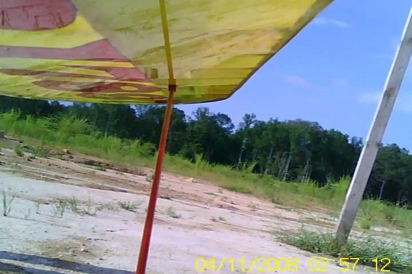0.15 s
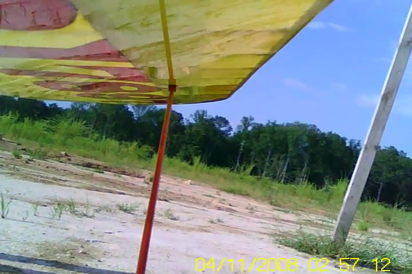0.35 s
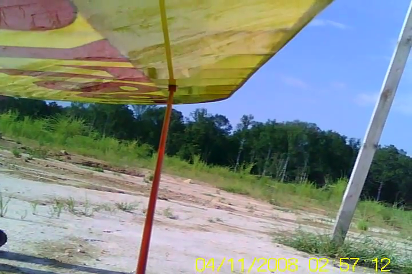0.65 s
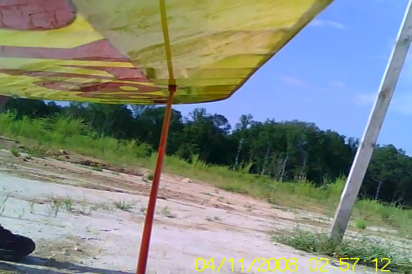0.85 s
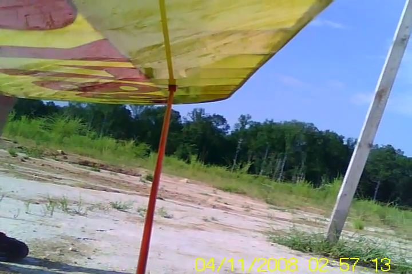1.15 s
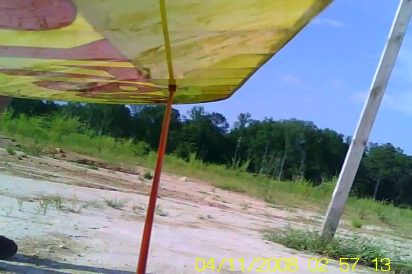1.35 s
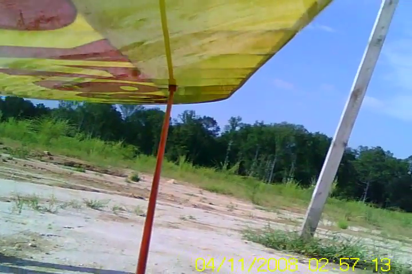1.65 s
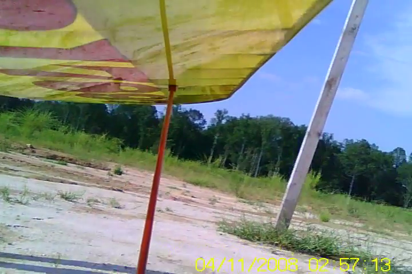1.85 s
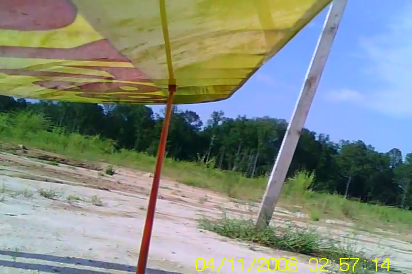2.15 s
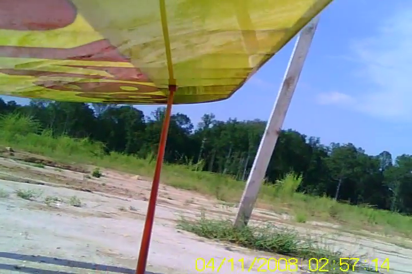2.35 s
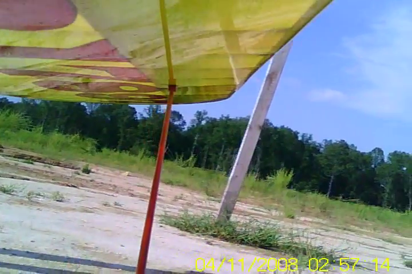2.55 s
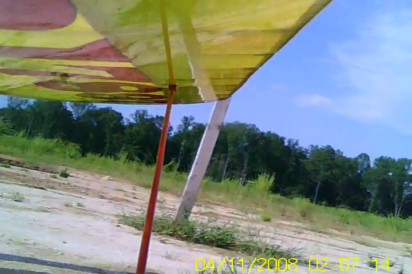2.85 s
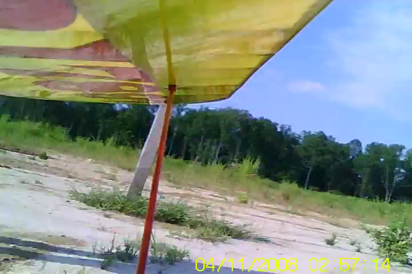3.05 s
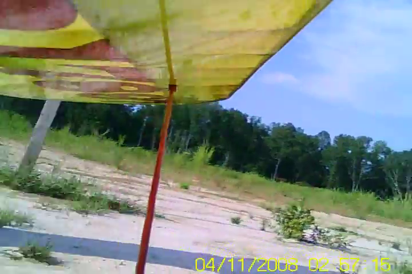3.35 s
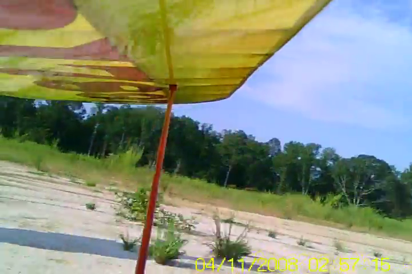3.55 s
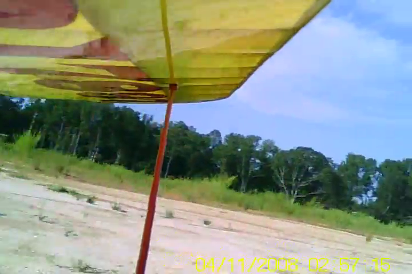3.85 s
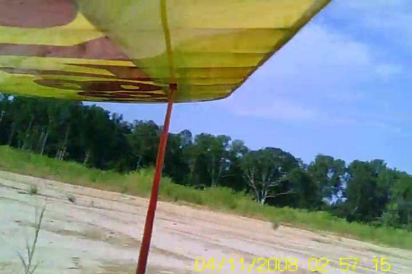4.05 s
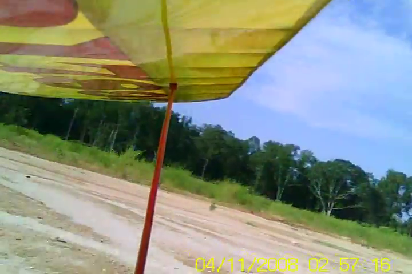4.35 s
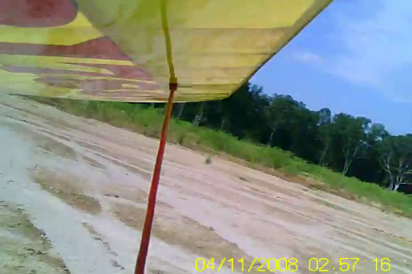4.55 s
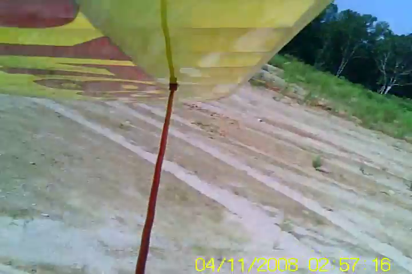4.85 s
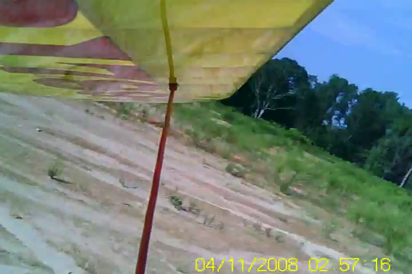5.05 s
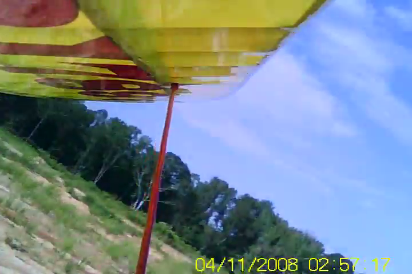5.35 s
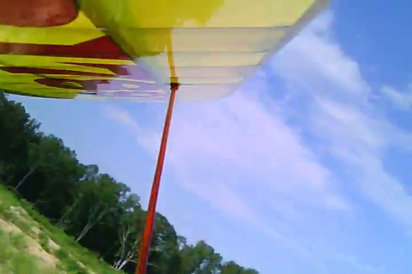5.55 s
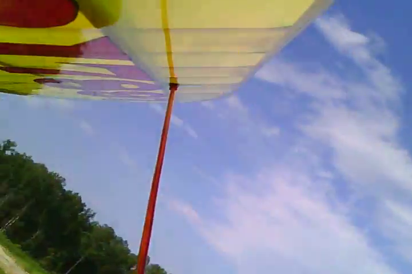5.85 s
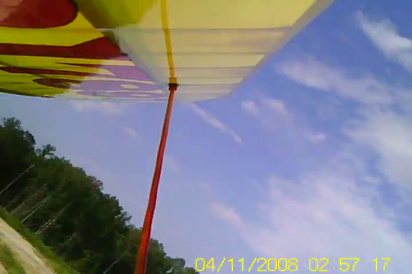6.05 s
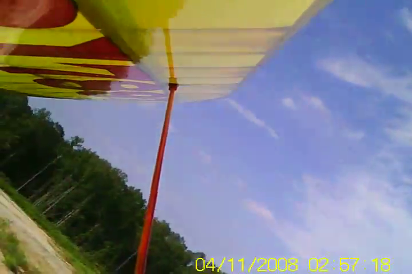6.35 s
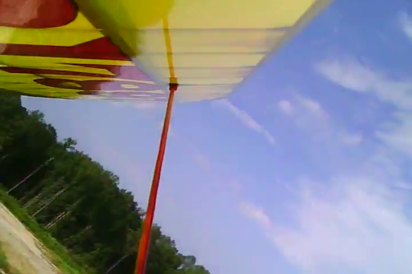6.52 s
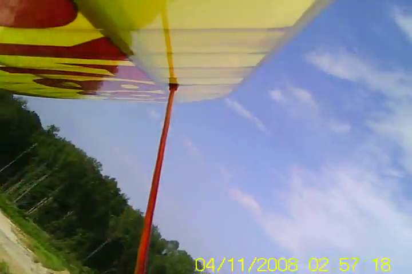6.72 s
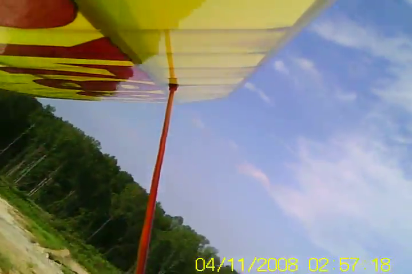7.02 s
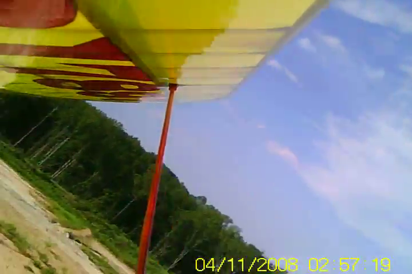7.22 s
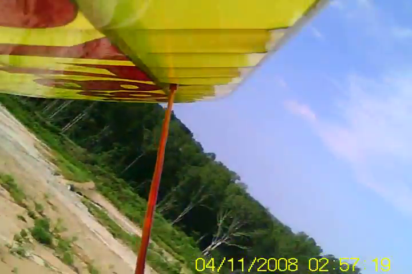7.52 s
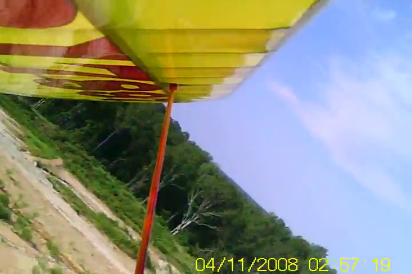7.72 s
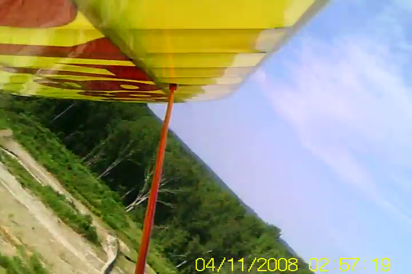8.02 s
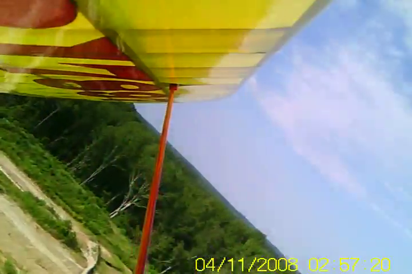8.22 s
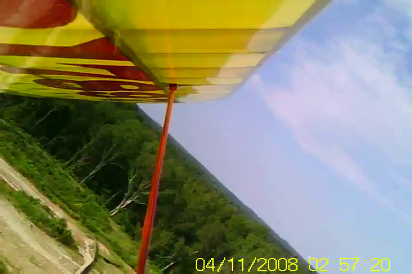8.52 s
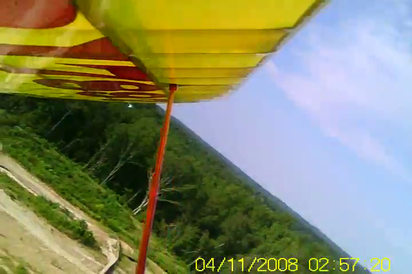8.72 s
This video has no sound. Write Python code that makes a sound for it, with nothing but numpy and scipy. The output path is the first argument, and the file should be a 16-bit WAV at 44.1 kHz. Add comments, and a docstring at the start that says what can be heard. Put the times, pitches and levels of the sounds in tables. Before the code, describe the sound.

Almost immediately, propeller wash from an electric model airplane starts rumbling on a microphone mounted under its wing. The buffeting grows in steps until about 1.2 seconds, with short slaps of air. Beneath it are a thin, very high whine, faint whistles that sweep with motor speed, and a light bearing rattle. A gust thumps at 1.3 seconds, and the motor and wind ease back. From 2.3 seconds the motor speeds up again, with another thump near 2.75, and reaches full power around 3.3 seconds. The whine fades away while the wind becomes a loud, rough, fluttering rush with more hiss, almost covering a low, wavering propeller drone. Sharp air slaps cluster between 4.2 and 4.6 seconds, and a gust thumps at 5. The heavy wind continues in swells and lulls, surging near 7.5 seconds and lasting to the end at about 9 seconds.

```python
"""Propeller wash and wind buffet a camera under the wing of an electric model airplane.
The airplane taxis, opens to full power and takes off. The air noise grows with shaft speed and all
but buries the propeller's drone; big gusts duck the camera's gain. At low speed the brushless motor
sweeps through a ring of its housing, its bearings rattle and its speed controller whines."""
import sys
import numpy as np
from scipy import signal
from scipy.fft import rfft, irfft
from scipy.io import wavfile
from scipy.ndimage import uniform_filter1d

SR = 44100
rng = np.random.default_rng(int(sys.argv[2]) if len(sys.argv) > 2 else 0)


def transcribe(u):
    """Save the signal u as a 16-bit wav file named by the first command-line argument.

    u: samples, shape (n,) or (channels, n), limited to [-1, 1]; the rate is SR.
    q: integer samples, one column per channel.
    """
    v = np.clip(np.atleast_2d(u).T, -1, 1)
    q = np.round(v * 32767).astype(np.int16)
    wavfile.write(sys.argv[1], SR, q)


N = 391608
TIME = np.arange(N) / SR
FREQ = np.maximum(np.arange(N // 2 + 1) * SR / N, 1)
FULL_POWER_S = 3.3


# tone colour of the airstream at the microphone port: (f/Hz, level/dB)
PORT_EQ = [(10, -47), (22, -1.5), (65, 0.5), (130, -1.5), (250, -7.5), (550, -12.5), (900, -16),
           (1600, -19), (2000, -25), (2400, -32), (3050, -34), (3600, -33), (4400, -42.5), (5000, -45.5),
           (6250, -38.5), (7000, -44.5), (7700, -46), (8600, -38), (9200, -43), (10000, -46.5),
           (11000, -59), (12000, -70)]
# extra colour that turns that airstream into slow propeller wash: (f/Hz, level/dB)
WASH_EQ = [(15, 14.5), (33, 6.5), (65, 5), (135, -1.5), (260, -1), (360, -3.5), (520, -1.3), (1100, 0.5),
           (2000, -4), (5000, -10), (9000, -13.5), (11000, -19)]


def wind(speed):
    """Large eddies buffet the diaphragm; each suction sheds smaller ones, a burst of rush and hiss."""
    buffet_db, rush_db, hiss_db = wind_levels(speed)
    port, wash = colour(PORT_EQ), colour(WASH_EQ)
    flight = np.clip((speed - 78) / 40, 0, 1)

    def eddies(share):
        """One size of eddies, crossfading from slow wash to fast airstream."""
        band = port * np.sqrt(share)
        return np.sqrt(1 - flight) * noise(band * wash) + np.sqrt(flight) * noise(band)

    large, small = below(238, 5), 1 - below(1022, 9.4)
    middle = (1 - large) * (1 - small) * below(2040, 2.3) ** 2
    buffet = eddies(large)
    bursts = unit(walk(245) - 0.6 * buffet)
    # a weak draught has no fine eddies in its rush
    strong = np.clip((rush_db + 33) / 11, 0, 1)
    rush = np.sqrt(strong) * eddies(middle) + np.sqrt(1 - strong) * eddies(middle * below(530, 5.5))
    rush *= undb(1.9 * bursts + 0.32 * walk(90))
    hiss = eddies(small * below(4730, 4)) * undb(1.77 * bursts + 0.93 * walk(370))
    # the finest eddies come in the shortest spurts, so the top flutters
    spurts = undb(1.9 * bursts + 1.63 * walk(220))
    flutter = eddies(1 - below(3450, 6.9)) * spurts
    hiss = unit(hiss) + undb(-15.5) * unit(flutter)
    return unit(buffet) * undb(buffet_db) + unit(rush) * undb(rush_db) + unit(hiss) * undb(hiss_db)


# large, middle and small eddies: (base level/dB, knee shaft speed/Hz, share of the turbulence felt)
BUFFET = (-15.5, 51, 0.76)
RUSH = (-18, 53.1, 0.25)
HISS = (-21, 75.4, 0.078)
# swells and lulls of the turbulent air along the way: (t/s, level/dB)
TURBULENCE = [(.14, 7), (.3, -2), (.48, -4), (.65, 4.5), (.8, 1), (1.42, 4.5), (1.68, -4), (2.52, -4.5),
              (2.62, -1), (3.5, 5.5), (4.05, -1), (4.25, 3.5), (5.15, 0.5), (5.48, -5), (5.95, 4.5),
              (7.45, 7.5), (7.7, 2.5), (8.88, 3)]
# fader ride on the hiss alone: (t/s, level/dB)
HISS_SWELL = [(.3, -5), (.45, 2), (.7, 0), (1.55, 1), (1.75, -2), (2.5, -0.6), (2.95, 0.5), (3.17, -1),
              (3.32, 2.5), (3.9, 2), (4.45, -1.5), (4.7, -0.5), (4.85, 1), (5.4, 1), (6.65, 0), (6.85, 2.5),
              (7.6, -1), (8.7, 1.5)]


def wind_levels(speed, arrival_s=0.13, trail_s=0.033, steepness=4.1):
    """Faders in dB for buffet, rush and hiss: each climbs with shaft speed, then flattens at its knee."""
    wash_hz = np.interp(TIME - trail_s, TIME, speed)
    turbulence_db = automation(TURBULENCE)
    gust_db, _ = gusts()
    arrival_db = -15 * (1 - settle(arrival_s, lag_s=0.018))
    ease_db = -8 * settle(FULL_POWER_S, lag_s=2.92)  # the wash eases as the airplane gathers speed
    shared_db = arrival_db + gust_db + ease_db
    levels = []
    for db, knee_hz, share in (BUFFET, RUSH, HISS):
        speed_db = -20 * np.log10(1 + (knee_hz / wash_hz) ** steepness)
        levels.append(db + speed_db + shared_db + share * turbulence_db)
    buffet_db, rush_db, hiss_db = levels
    # the middle eddies take longer to build once the wash arrives
    build_db = -8 * (1 - settle(arrival_s, lag_s=0.1))
    return buffet_db, rush_db + build_db, hiss_db + automation(HISS_SWELL)


# gusts that swell into a thump: (t/s, build-up/s, swell/dB, shove level/dB)
GUSTS = [(1.333, 0.039, 0.5, 0.5), (2.75, 0.033, 1.5, 2.5), (4.977, 0.046, 4, -3)]


def gusts(collapse_s=0.0047):
    """Each gust swells the wind, then collapses in one slow shove of pressure on the diaphragm."""
    swell_db, shoves = 0, 0
    for s, build_s, rise_db, shove_db in GUSTS:
        swell_db += rise_db * np.exp(-np.abs(TIME - s) / build_s) * (1 - settle(s, collapse_s))
        shoves += undb(shove_db) * np.exp(-((TIME - s) / collapse_s) ** 2)
    return swell_db, shoves


# hard slaps of air: (t/s, relative level/dB, length/s)
SLAPS = [(0.555, -6, 0.0013), (0.571, -5, 0.003), (0.969, -11, 0.006), (1.211, -1.5, 0.0042),
         (1.264, -8, 0.0044), (2.18, -15, 0.0028), (2.722, -15, 0.0034), (2.732, -7, 0.0045),
         (2.885, 1, 0.0033), (3.017, -16, 0.0035), (4.233, -6, 0.0027), (4.257, -3, 0.0048),
         (4.424, 1.5, 0.0023), (4.571, -4, 0.0047), (4.585, 2.5, 0.0059), (4.919, -13, 0.0048),
         (4.967, -14, 0.0028), (7.27, -15, 0.0054), (7.506, -4, 0.0073)]


def slaps():
    """Single strong eddies burst on the port, each a short spurt of noise."""
    envelope = sum(undb(db) * np.exp(-((TIME - s - .002) / (length / 2)) ** 4) for s, db, length in SLAPS)
    spurt = noise(colour(PORT_EQ) * np.sqrt(1 - below(760, 1.4)) * below(2400, 3.1))
    return undb(-9.5) * envelope * spurt


# partials of the drone: (multiple of the shaft rate, base level/dB)
DRONE = [(1, -26), (2, -35), (3, -40), (4, -47)]
# fader ride on the drone as the blades load and unload: (t/s, level/dB)
THRUST = [(0, -8), (3.3, 5), (3.7, 6.5), (4.5, -.5), (5, 4.5), (5.7, -7), (6.3, 0.5), (7.2, 3), (7.8, -8.5),
          (8.88, 0.5)]


def propeller(speed, turns):
    """Shaft unbalance and two blades drone, growing steeply with speed and wavering in the wash."""
    sway = turns + .02 * walk(3)
    drone = sum(undb(db) * tone(k * sway) * undb(1.5 * walk(3.4)) for k, db in DRONE)
    return drone * undb(automation(THRUST)) * (speed / speed.max()) ** 4


# partials of the magnetic pull, mostly multiples of the fourteen poles: (multiple of the shaft rate)
MAGNET_ORDERS = (34, 39, 42, 56, 70, 84, 98, 112, 140, 168)
# their balance going into the housing: (level/dB)
MAGNET_DB = (-43, -57, -41, -62, -60, -53, -68, -67, -54, -59)
# rings of the motor housing: (f/Hz, width/Hz, level/dB)
HOUSING_RINGS = [(1030, 77, -17), (1990, 200, -7), (3050, 280, 1.5), (4330, 51, -12), (6400, 210, -3)]


def motor(speed, turns, pull_db):
    """Partials of the magnetic pull whistle as they sweep across the housing's rings."""
    housing = sum(undb(db) * np.abs(ring(FREQ, hz, width)) ** 2 for hz, width, db in HOUSING_RINGS)
    whistle = sum(undb(db) * np.interp(k * speed, FREQ, housing) * tone(k * turns)
                  for k, db in zip(MAGNET_ORDERS, MAGNET_DB))
    return whistle * undb(pull_db + 1.4 * walk(30))


# resonances of the motor mount and airframe: (f/Hz, width/Hz, relative level/dB)
FRAME_RINGS = [(170, 360, 1.5), (360, 45, 9.5), (540, 23, -9), (813, 42, 0), (970, 58, 1.5),
               (1420, 1100, -21), (1860, 85, -1.5), (2030, 95, -3), (3000, 114, -8), (3460, 290, -18),
               (6400, 170, -18), (8470, 220, -13.5)]


def bearings(speed, turns, pull_db):
    """The bearings rattle the airframe in fits and their scrape rings the port, more so under hard pull."""
    rattle = 0
    for hz, width, db in FRAME_RINGS:
        mode = noise(np.abs(ring(FREQ, hz, width)) * np.abs(ring(FREQ, hz, 5 * width)))
        rattle += undb(db) * np.sqrt(width) * mode * undb(5.1 * walk(26))
    scrape = noise(colour(PORT_EQ) * (1 - below(2100, 1.5)))
    pulse = 1 + 0.063 * tone(turns)  # once a turn
    load = undb(0.29 * pull_db) * (speed / speed[0]) ** 0.4
    return (unit(rattle) * undb(-44.5) + scrape * undb(-56)) * pulse * load


# side tones of the whine: (offset from the carrier in multiples of the shaft rate)
SIDE_ORDERS = (-28, -14, -10, -4, 2, 10, 13, 14, 15, 16, 17, 18, 20, 28)
# their balance at a brisk taxi, going into the motor bell: (level/dB)
SIDE_DB = (-75, -71, -71, -82, -76, -65, -81, -65, -81, -76, -79, -80, -80, -66.5)


def controller(speed, turns, whine_db, carrier_hz=8030, taxi_hz=62):
    """The speed controller chops the current at one pitch; the passing magnets add side tones."""
    carrier = carrier_hz * TIME
    # the shaft turns a little unevenly, which blurs the far side tones
    uneven = turns + .004 * walk(25)
    sides = 0
    for k, db in zip(SIDE_ORDERS, SIDE_DB):
        hz = carrier_hz + k * speed
        # the motor bell radiates best near two of its rings
        bell = 0.3 + 1.64 * np.abs(ring(hz, 8130, 300)) + np.abs(ring(hz, 9790, 240)) ** 2
        # the farthest side tones need the most current, so they grow fastest with speed
        growth = (speed / taxi_hz) ** (3.5 * (k / max(SIDE_ORDERS)) ** 2)
        high_cut = 1 / (1 + (hz / 9900) ** 20)
        sides += undb(db) * growth * bell * high_cut * tone(carrier + k * uneven)
    return undb(whine_db) * (undb(-59.5) * tone(carrier) + sides * undb(2.0 * walk(17)))


# cues for the throttle stick: (t/s, shaft speed asked for/Hz)
THROTTLE = [(.05, 37.6), (.432, 62.7), (.93, 71.5), (1.11, 79), (1.29, 52.2), (2.28, 66.8), (2.605, 86.8),
            (3.145, 128.6)]


def throttle(idle_hz=26.2, settle_turns=6.5):
    """Shaft speed that the stick asks for, and the speed reached as the shaft catches up."""
    asked = reached = before = idle_hz
    for s, hz in THROTTLE:
        asked += (hz - before) * settle(s, lag_s=.01)
        reached += (hz - before) * settle(s, lag_s=settle_turns / hz)
        before = hz
    return asked, reached


def undb(db):
    """Decibels to gain."""
    return 10 ** (np.asarray(db) / 20)


def unit(x):
    """Scale to an rms of one."""
    return x / np.std(x)


def automation(points):
    """Fader line through (t/s, level/dB) points."""
    return np.interp(TIME, *np.transpose(points))


def settle(start_s, lag_s):
    """Rise from nothing at the start towards one, with the given time constant."""
    return 1 - np.exp(-np.maximum(TIME - start_s, 0) / lag_s)


def colour(points):
    """Gain at every frequency from (f/Hz, level/dB) points."""
    hz, db = np.transpose(sorted(points))
    return undb(np.interp(np.log(FREQ), np.log(hz), db))


def below(edge_hz, slope):
    """Soft low-pass curve, one half at the edge."""
    return 1 / (1 + (FREQ / edge_hz) ** slope)


def ring(hz, centre_hz, width_hz):
    """Complex response of one resonance, one at its centre."""
    return 1 / (1 + 1j * (hz ** 2 - centre_hz ** 2) / (hz * width_hz))


def noise(gain):
    """Unit-rms noise shaped by a gain at every frequency."""
    return unit(irfft(rfft(rng.standard_normal(N)) * gain, N))


def walk(rate_hz):
    """Random wavering, mostly between a few times a second and the given rate."""
    return noise(FREQ / (FREQ + 2) / (1 + (FREQ / rate_hz) ** 2))


def tone(turns):
    """Unit-rms sine that starts at a random phase."""
    return np.sqrt(2) * np.sin(2 * np.pi * (turns + rng.random()))


def scene():
    """The throttle sets one shaft speed, which drives wind, propeller, motor, bearings and controller."""
    asked, reached = throttle()
    sag_hz = 3.2 * settle(FULL_POWER_S, lag_s=2.0)  # the battery sags at full power
    speed = reached - sag_hz
    turns = np.cumsum(speed) / SR
    # the chopped current ripples most at half throttle and hardly at all when full on
    ripple_db = 20 * np.log10(np.sin(np.pi * reached / reached.max()) + .02)
    # the magnets pull harder while the shaft lags the stick
    surge_db = 1.6 * 20 * np.log10(asked / reached)
    pull_db = ripple_db + surge_db - 1.5
    _, shoves = gusts()
    air = wind(speed) + shoves + slaps()
    drive = propeller(speed, turns) + motor(speed, turns, pull_db) + bearings(speed, turns, pull_db)
    whine = controller(speed, turns, whine_db=ripple_db + 3.5)
    return (air + drive + whine)[None]


def record(dry, limit_db=-5.5, recover_db_per_s=3, top_hz=12100):
    """The camera ducks its gain at a big swing and recovers slowly; it clips peaks and cuts the top."""
    swing = uniform_filter1d(np.abs(dry[0]), size=353)
    over_db = 20 * np.log10(np.maximum(swing / undb(limit_db), 1))
    recovery_db = recover_db_per_s * TIME
    duck_db = np.maximum.accumulate(over_db + recovery_db) - recovery_db
    clipped = np.clip(dry * undb(-duck_db), -.7, .7)
    return signal.sosfilt(signal.ellip(10, .2, 80, top_hz, fs=SR, output="sos"), clipped)


dry = scene()
out = record(dry)
transcribe(out)
```